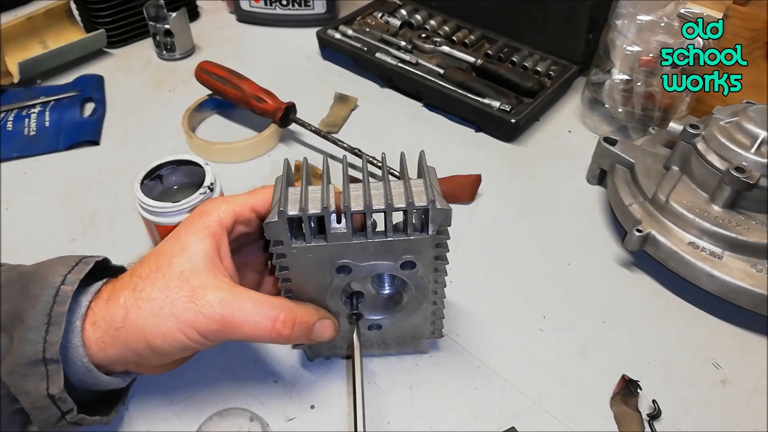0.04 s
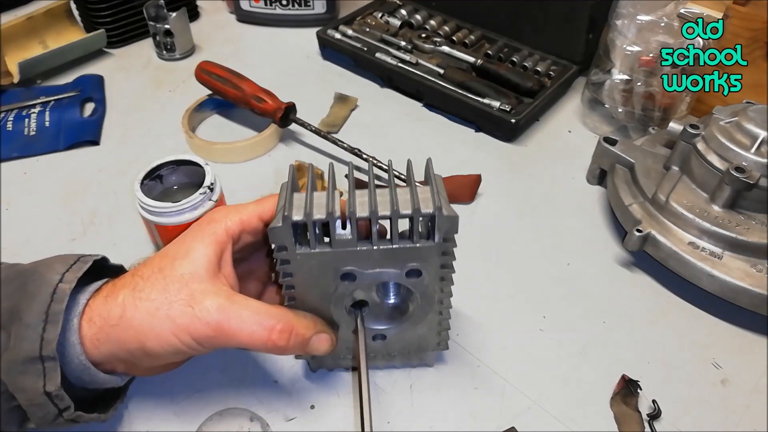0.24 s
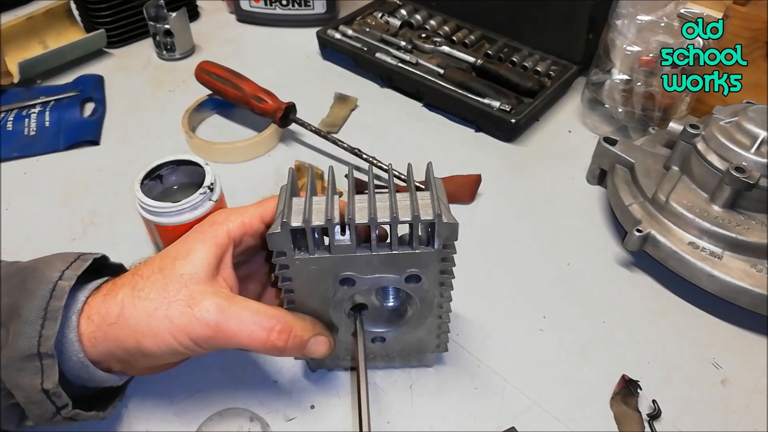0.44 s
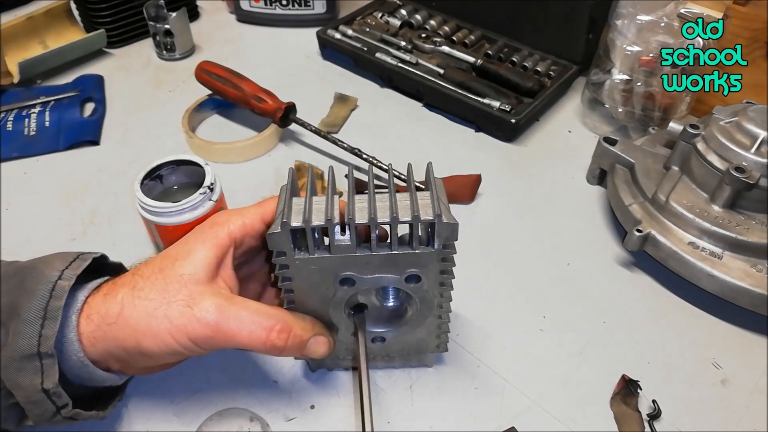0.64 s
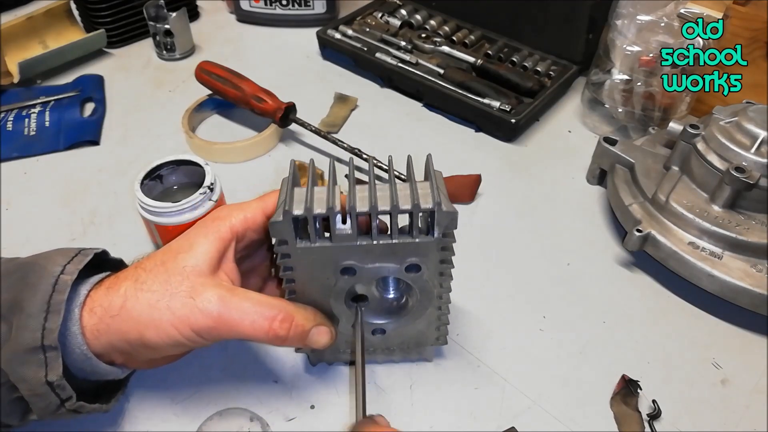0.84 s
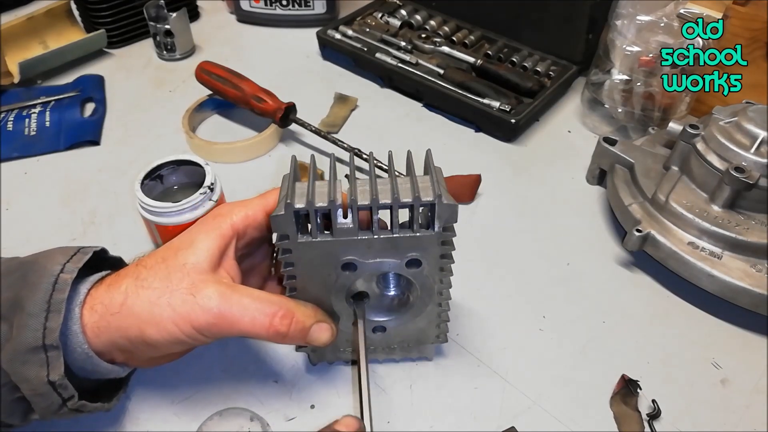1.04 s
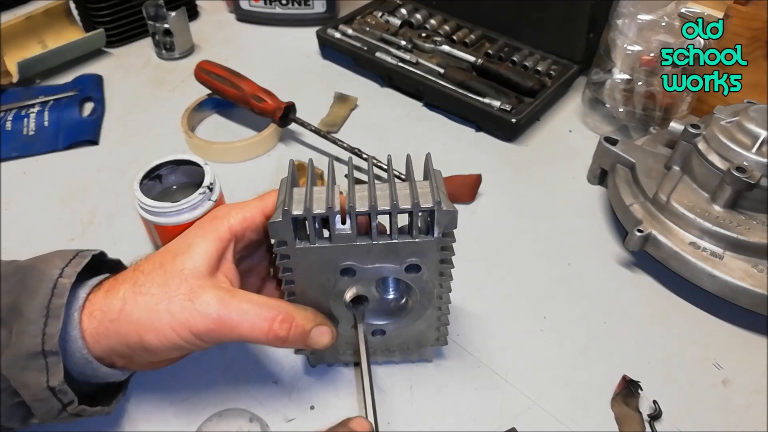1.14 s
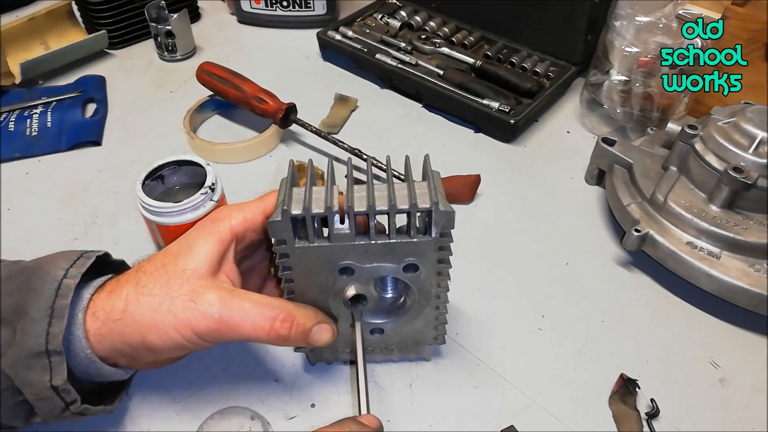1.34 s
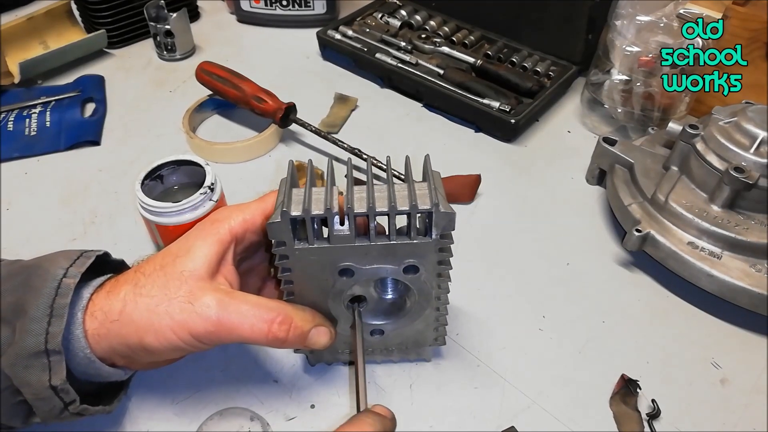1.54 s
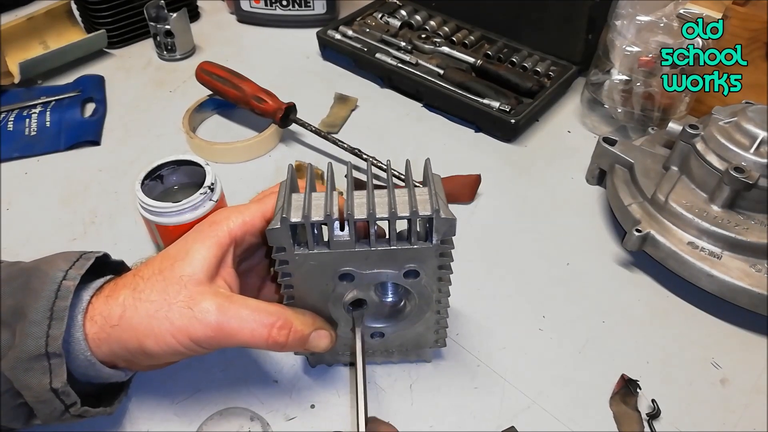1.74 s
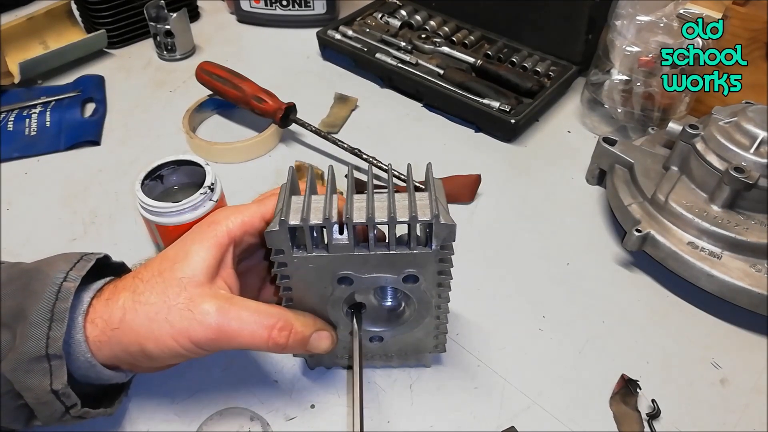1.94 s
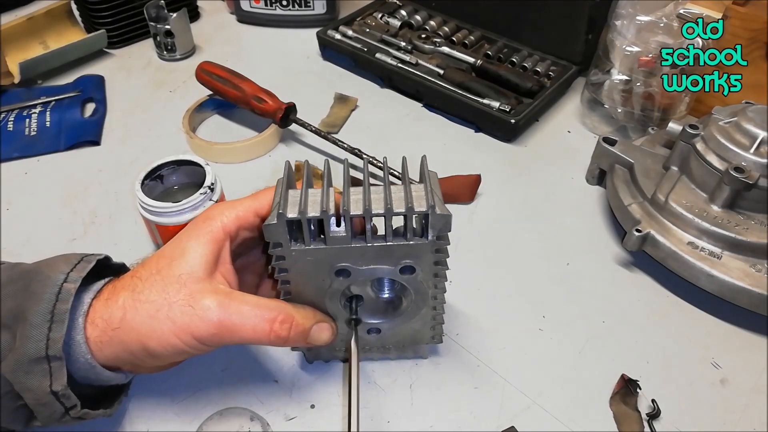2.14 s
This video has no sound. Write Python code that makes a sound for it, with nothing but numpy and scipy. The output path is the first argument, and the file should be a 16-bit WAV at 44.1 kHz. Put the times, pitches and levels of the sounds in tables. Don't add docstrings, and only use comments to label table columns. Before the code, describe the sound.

A steel valve is ground on its gritty seat in a finned alloy head, close in a small workshop. The stem scrapes from 0.17 s and clanks at 0.26 s, ringing briefly. A dull knock at 0.42 s; crisp, sandy twists at 0.6-1.2 and 1.4-2.1 s, with snapping grains. Hard bench knocks cluster at 1.82 s; a faint slide ends near 2.25 s. A distant engine slowly speeds up as traffic nears.

```python
import sys
import numpy as np
from scipy import signal
from scipy.fft import rfft, irfft
from scipy.io import wavfile

SR = 44100
rng = np.random.default_rng(int(sys.argv[2]) if len(sys.argv) > 2 else 0)


def transcribe(u):
    v = np.clip(np.atleast_2d(u).T, -1, 1)
    q = np.round(v * 32767).astype(np.int16)
    wavfile.write(sys.argv[1], SR, q)


def field_ratio(decibels):
    return 10 ** (np.asarray(decibels, dtype=float) / 20)


N = 97020
TIME = np.arange(N) / SR
OPPOSED = np.array([[1], [-1]])
SPREAD_HZ = 410
GRAINS_PER_S, GRAIN_SPREAD_DB = 4600, 2.5


def evened(x):
    return x / np.sqrt(np.mean(x ** 2) + 1e-20)


def read(points, hz):
    f, value = np.transpose(points)
    return np.interp(np.log(hz + 1), np.log(f + 1), value)


def colour(x, points):
    log_gain = np.log(field_ratio(read(points, abs(np.fft.fftfreq(4096, 1 / SR)))))
    response = np.exp(log_gain - 1j * signal.hilbert(log_gain).imag)
    taps = np.fft.ifft(response).real[:2048]
    return signal.oaconvolve(x, taps / np.linalg.norm(taps))[:len(x)]


def resonate(x, hz, width_hz):
    r = np.exp(-np.pi * width_hz / SR)
    pole = r * np.exp(2j * np.pi * hz / SR)
    return np.sqrt(2 * (1 - r * r)) * signal.lfilter([1], [1, -pole], x).real


def lows(x, hz):
    return signal.sosfiltfilt(signal.butter(2, hz, fs=SR, output="sos"), x)


def spread(x):
    return OPPOSED * signal.sosfilt(signal.butter(2, SPREAD_HZ, "high", fs=SR, output="sos"), x)


def wander(per_s):
    rate_hz = 200
    count = int(N / SR * rate_hz) + 2
    z = rfft(rng.standard_normal(count))
    z = z / (1 + (np.fft.rfftfreq(count, 1 / rate_hz) / per_s) ** 4)
    return np.interp(TIME, np.arange(count) / rate_hz, evened(irfft(z, count)))


def grains(per_s, spread_db):
    hit, sign, size = rng.random((3, N))
    size_db = spread_db * np.minimum(-np.log(size + 1e-9), 5)
    return evened((hit < per_s / SR) * np.sign(sign - .5) * field_ratio(size_db))


def rings(modes, count=SR // 2):
    t = np.arange(count) / SR
    return np.array([field_ratio(db - 60 * t / t60) * np.sin(2 * np.pi * hz * t) for hz, db, t60 in modes])


# hz, level_db
FLOOR_SPECTRUM = [(12, 4), (20, 2.5), (112, 0.5), (191, -23.5), (315, -28.5), (1500, -24), (1720, -23),
                  (2040, -26), (15600, -38.5)]
# hz, level_db
FLOOR_SIDE_SPECTRUM = [(12, -27), (20, 7), (298, -5), (650, -5), (769, -15), (3010, -6.5), (15600, -22)]


def hush(points, db):
    z = rfft(rng.standard_normal(N)) * field_ratio(read(points, np.fft.rfftfreq(N, 1 / SR)))
    return field_ratio(db + 1.2 * wander(1.66)) * evened(irfft(z, N))


# hz, level_db
ROAD_SPECTRUM = [(35, -15), (60, -2), (342, -4.5), (594, -22), (1080, -11.5), (2540, -19), (8000, -30),
                 (10400, -58), (17600, -120)]


def street():
    road = hush(ROAD_SPECTRUM, -53.5) * field_ratio(16.5 * (TIME / TIME[-1] - 1))
    hum_hz, width_hz = 93.4, 7.9
    hum = resonate(rng.standard_normal(N), hum_hz, width_hz)
    hum = field_ratio(-60) * evened(resonate(hum, hum_hz, width_hz))
    return road + hum + spread(np.roll(road, SR // 20))


# time_s, firing_hz, level_db
ENGINE_RUN = [(0, 30.96, -57), (.45, 35.58, -63), (0.571, 37.92, -46.5), (0.701, 37.52, -38),
              (.92, 39.56, -44), (1.152, 41.33, -35), (1.3, 43, -55.5), (1.501, 45, -48.5),
              (1.67, 45.7, -43.5), (1.8, 46.48, -51.5), (2.001, 47.04, -54.5), (2.2, 48.7, -57)]


def engine():
    s, firing_hz, level_db = np.transpose(ENGINE_RUN)
    phase = 2 * np.pi * np.cumsum(np.interp(TIME, s, firing_hz)) / SR
    third_db = -68.5 + 14 * np.exp(-((TIME - 1.996) / 0.13) ** 2)
    # order, level_db, unsteadiness
    orders = [(1, np.interp(TIME, s, level_db), 0.78), (3, third_db, 0.25), (4, -80, 1)]
    out = np.zeros(N)
    for order, db, unsteady in orders:
        rough = .3 * unsteady
        level = np.sqrt(2) * field_ratio(db) * (1 + rough * wander(17))
        out += level * np.sin(order * phase + rough * wander(3.5))
    return out


# time_s, level_db, brightness_db_per_octave
KNOCK_HITS = [
    (.002, -51.5, 3.5),
    (0.4208, -36.5, 8),
    (0.871, -48, 7.5),
    (1.263, -46.5, 4.5),
    (1.8216, -35, 7),
    (1.8288, -40.5, 2),
    (1.8386, -41, 9),
    (1.8426, -37, 3),
    (1.921, -42.5, 7),
    (2.188, -44, 7),
]
# hz, level_db, t60_s
BENCH_MODES = [(125, -14, .12), (240, -7, .1), (280, -1, .13), (425, -2, .04), (480, -4, .035),
               (680, -7, .025), (960, -10, .02), (1300, -17, .015), (1750, -34, .012)]


def knocks():
    count = SR // 4
    rise_s = .0005
    modes = rings(BENCH_MODES, count) * np.minimum(np.arange(count) / SR / rise_s, 1)
    octaves = np.log2(np.transpose(BENCH_MODES)[0] / 280)
    spots = rng.uniform(.6, 1.2, (len(KNOCK_HITS), len(BENCH_MODES)))
    out = np.zeros(N + SR)
    for (s, db, bright_db), spot in zip(KNOCK_HITS, spots):
        out[round(s * SR):][:count] -= field_ratio(db - 3.5) * (spot * field_ratio(bright_db * octaves)) @ modes
    return out[:N]


# start_s, end_s, final_level_db, rise_db, ring_db
STEM_SLIDES = [
    (0.169, 0.2545, -31, 40, -19),
    (2.111, 2.253, -48, 21.7, -15),
]
# hz, level_db
SCRAPE_SPECTRUM = [(88, -28), (150, -24.5), (1050, -5), (1770, -29.5), (2820, -15), (3110, -25.5),
                   (3920, -22), (7300, -17.5), (15600, -47)]
# hz, width_hz, level_db
GUIDE_MODES = [(277, 30, -7), (430, 80, -5), (1050, 300, -14), (3900, 200, -10), (6200, 500, -9)]


def slides():
    spread_db = 1.0
    grit = grains(9000, spread_db) * field_ratio(spread_db * wander(56))
    out = np.zeros(N)
    for start, end, db, rise_db, ring_db in STEM_SLIDES:
        ramp_db = -rise_db * abs((end - TIME) / (end - start)) ** 1.85
        scrape = grit * (TIME < end + .002) * field_ratio(db)
        out += colour(scrape * field_ratio(ramp_db), SCRAPE_SPECTRUM)
        for hz, width_hz, mode_db in GUIDE_MODES:
            share, extra_db = (.6, ring_db) if hz > 2000 else (1, -12)
            out += resonate(scrape * field_ratio(share * ramp_db + mode_db + extra_db), hz, width_hz)
    return out


# time_s, level_db
CLANK_HITS = [
    (.2557, -11),
    (.2568, -13),
    (.2573, -14),
    (.2586, -18),
    (.2604, -18),
    (.2655, -24),
]
# hz, level_db
CRACK_SPECTRUM = [(140, -22), (240, 0), (1820, -3.5), (2360, -2.5), (3120, -7), (7480, -1), (14300, -33),
                  (15600, -39)]


def clank():
    count, t60_s = 3000, .015
    t = np.arange(count) / SR
    push = -1.3 * np.sin(2 * np.pi * np.minimum(2900 * t, 1))
    out = np.zeros(N)
    for (s, db), puff in zip(CLANK_HITS, rng.standard_normal((len(CLANK_HITS), count))):
        out[round(s * SR):][:count] += field_ratio(db - 9 - 60 * t / t60_s) * (push + puff)
    return colour(out, CRACK_SPECTRUM)


HEAD_MODE_HZ = [275, 1064, 2270, 2512, 2872, 3413, 5782, 5962, 6287, 6438, 7354, 8221, 8416, 9997]
HEAD_MODE_DB = [-14, -22, -16, -24, -31, -33, -20, -16.5, -22, -22, -33, -29, -26, -34]
HEAD_MODE_T60_S = [.1, .086, .03, .17, .12, 1.0, .075, .15, .11, .085, .2, .22, .1, .06]


def head():
    count = SR // 2
    age = np.arange(count) / SR
    blow_s, blow_db = CLANK_HITS[0]
    ring = np.zeros(count)
    for mode in field_ratio(blow_db) * rings(zip(HEAD_MODE_HZ, HEAD_MODE_DB, HEAD_MODE_T60_S)):
        ring += mode * field_ratio(wander(38)[:count])
    grip_s, grip_db_per_s, rise_s = .25, 220, .003
    grip = field_ratio(-grip_db_per_s * np.maximum(age - grip_s, 0))
    out = np.zeros(N)
    out[round(blow_s * SR):][:count] = ring * np.minimum(age / rise_s, 1) * grip
    side = .8 * np.roll(out - lows(out, SPREAD_HZ), 9)
    return out + OPPOSED * side


# time_s, level_db, weight_db (extra low body)
GRIND_PRESSURE = [(0.531, -76, -22), (0.577, -61.5, -2), (0.596, -45.5, -3), (0.811, -44, 0),
                  (.85, -52, -2.5), (.93, -48.5, 0.5), (1, -50, 5.5), (1.1, -45, -1), (1.187, -48.5, -8.5),
                  (1.225, -87, 8), (1.27, -65.5, -2), (1.405, -81, 1), (1.414, -57.5, -2),
                  (1.433, -51.5, -7), (1.697, -49.5, 5.5), (1.88, -55.5, 8.5), (2.035, -60.5, 10.5),
                  (2.13, -80, 15)]
# hz, level_db
GRIT_SPECTRUM = [(500, -18), (1300, -19), (3250, -14.5), (6000, -11), (7800, -9), (8400, 1), (11200, -9),
                 (12000, -14.5), (15600, -19.5)]
SEAT_MODE_HZ = [1640, 2480, 4520, 5100, 5960, 6290, 8220, 8420, 9070, 9600, 9812, 10100]
# width_hz, level_db before 1.8 s, level_db after 1.8 s
SEAT_MODES = [(148, -14.5, -6.5), (71.27, -63, -48), (127.13, -26, -49), (105, -6.5, -19), (110, -9, -26),
              (79.6, -34, -36), (30.3, -4.5, 4), (71, 6.5, -18), (60, -22, -17), (43, -18, 0),
              (31.7, 2, -10), (53, -42, -1)]


def grind():
    change_s, fade_db_per_s, late_wider = 1.8, 9, 2.5
    turn = round(change_s * SR)
    s, level_db, weight_db = np.transpose(GRIND_PRESSURE)
    weight_db = np.interp(TIME, s, weight_db)
    pressure = field_ratio(np.interp(TIME, s, level_db, -120, -120))
    chatter = field_ratio(1.5 * wander(38))
    gains = []
    for _, early_db, late_db in SEAT_MODES:
        mode_db = np.where(TIME < change_s, early_db, late_db - fade_db_per_s * (TIME - change_s))
        gains.append(field_ratio(mode_db - 1.5 * wander(8)))
    spots = []
    for _ in range(2):
        grit = grains(GRAINS_PER_S, GRAIN_SPREAD_DB) * chatter
        whole = field_ratio(9) * colour(grit, GRIT_SPECTRUM)
        for k, (hz, gain) in enumerate(zip(SEAT_MODE_HZ, gains)):
            width_hz = SEAT_MODES[k][0]
            first = resonate(grit[:turn], hz, width_hz)
            back = resonate(grit[turn:], hz, late_wider * width_hz)
            whole = whole + (-1) ** k * gain * np.r_[first, back]
        low = lows(whole, 6040)
        top = whole - lows(whole, 11000)
        middle = whole - low - top
        shaped = low * field_ratio(weight_db + 2.2 * wander(7.1)) + middle + top * field_ratio(-.21 * weight_db)
        spots.append(pressure * shaped / np.std(whole - low))
    return spots


# time_s, level_db
TICK_HITS = [(0.586, -50), (0.5885, -31.5), (0.671, -29), (.775, -30), (0.8228, -32), (0.8846, -36),
             (.921, -34), (.9629, -30), (1.05, -30), (1.114, -44), (1.1638, -44), (1.195, -41),
             (1.2527, -43), (1.41, -48), (1.4325, -35), (1.4938, -37), (1.5453, -45), (1.588, -31),
             (1.6637, -35.5), (1.779, -36), (1.8668, -34), (1.9601, -41), (2.0273, -41)]


def ticks():
    count, t60_s = 1500, .035
    t = np.arange(count) / SR
    out = np.zeros(N + count)
    for (s, db), puff in zip(TICK_HITS, rng.standard_normal((len(TICK_HITS), count))):
        out[round(s * SR):][:count] += field_ratio(db - 9.5 - 60 * t / t60_s) * puff
    return colour(out[:N], GRIT_SPECTRUM)


# middle_s, length_s, pitch_hz,
# level_db
ROUGH_PATCHES = [
    (0.7, 0.21, 1050, -64),
    (1.603, 0.27, 4550, -60),
    (2.4, 0.12, 7246, -55),
    (1.68, 0.14, 2500, -63),
    (1.695, 0.22, 6100, -56),
    (2.196, 0.1, 2247, -53),
    (2.193, 0.088, 7236, -53.5),
]


def patches():
    grit = grains(GRAINS_PER_S, GRAIN_SPREAD_DB)
    out = np.zeros(N)
    for s, length, hz, db in ROUGH_PATCHES:
        swell = np.cos(np.pi * np.clip((TIME - s) / length, -.5, .5))
        out += field_ratio(db) * swell * resonate(grit, hz, hz / 10)
    return out


# hz, t60_s
ROOM_DECAY = [(250, 0.41), (1000, 0.3), (4000, 0.35), (10000, 0.31)]


def room(x):
    taps = np.zeros((2, SR // 2))
    at = np.arange(200, SR // 2 - 20, 20)
    places = at + rng.integers(0, 20, (2, len(at)))
    np.put_along_axis(taps, places, rng.choice([-1., 1.], (2, len(at))), 1)
    hz, t, z = signal.stft(taps, SR, nperseg=256)
    decay = field_ratio(-60 * t / read(ROOM_DECAY, hz)[:, None])
    tail = signal.istft(z * decay, SR, nperseg=256)[1]
    return signal.fftconvolve(x[None], tail / np.linalg.norm(tail[0]), axes=1)[:, :N]


def pair(x, apart):
    t60_s = .02
    taps = rng.standard_normal(900) * field_ratio(-60 * np.arange(900) / SR / t60_s)
    wet = room(x) * field_ratio(-10)
    side = signal.oaconvolve(x + apart, taps / np.linalg.norm(taps))[:N] + wet[1]
    return x + wet[0] + spread(side)


def scene():
    near, far = grind()
    share = .98
    apart = np.sqrt(share) * far + (np.sqrt(1 - share) - 1) * near
    bench = knocks() + slides() + clank() + near + ticks() + patches()
    floor = hush(FLOOR_SPECTRUM, -56) + OPPOSED * hush(FLOOR_SIDE_SPECTRUM, -66)
    return pair(bench, apart) + head() + engine() + street() + floor


def roll_off(x):
    return signal.sosfilt(signal.butter(12, 15720, fs=SR, output="sos"), x)


def record(dry):
    band = signal.lfilter(*signal.iirpeak(690, 2, fs=SR), dry[0])
    mix = np.array([dry[0] - .6 * band, dry[1]])
    return roll_off(mix)


dry = scene()
out = record(dry)
transcribe(out)
```